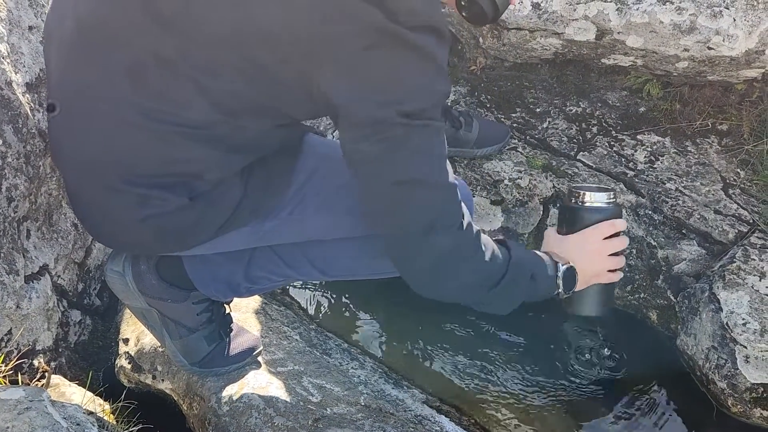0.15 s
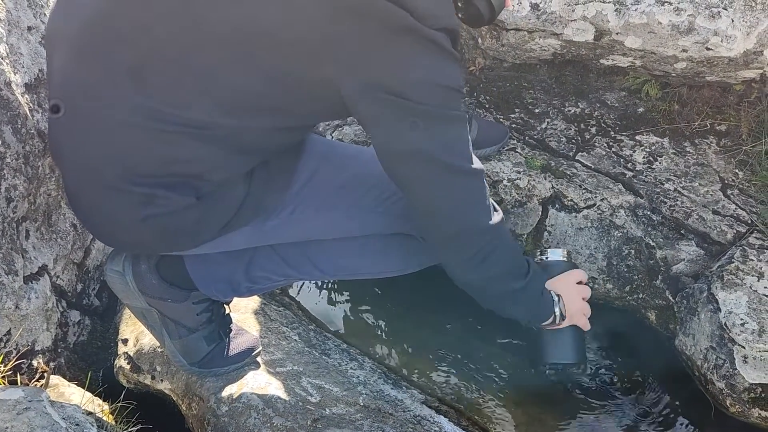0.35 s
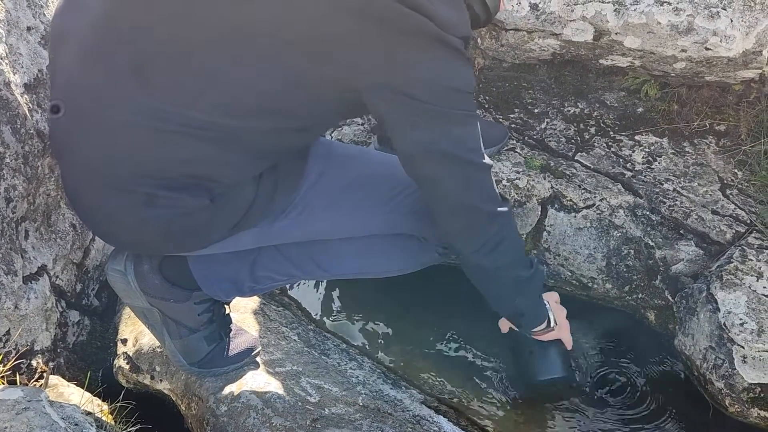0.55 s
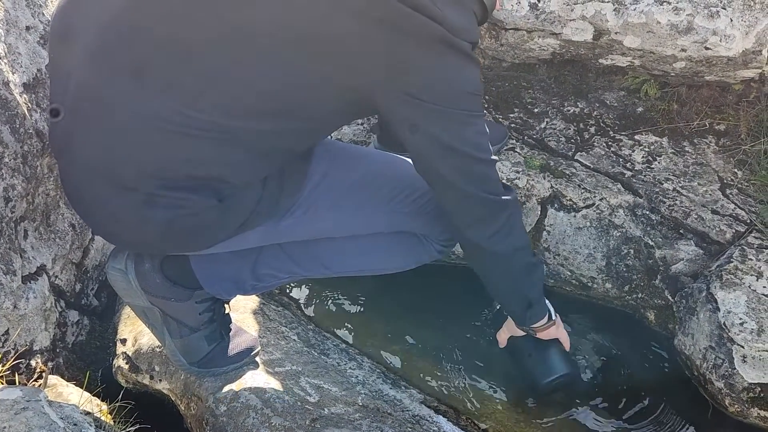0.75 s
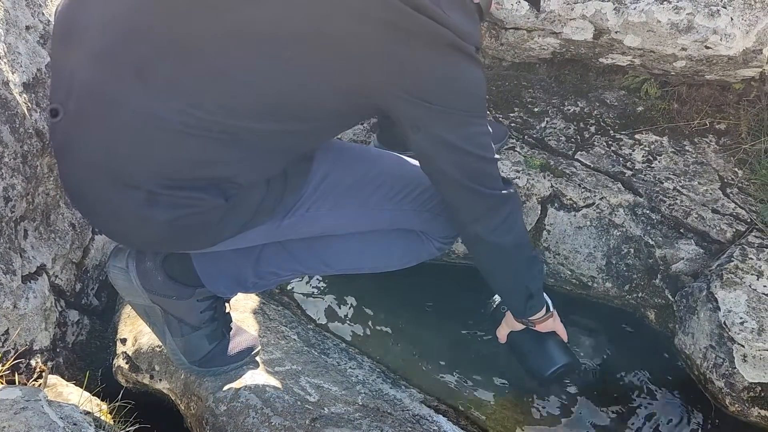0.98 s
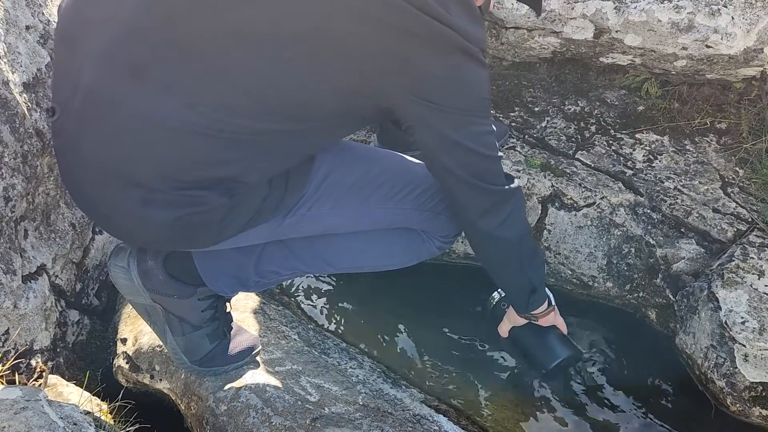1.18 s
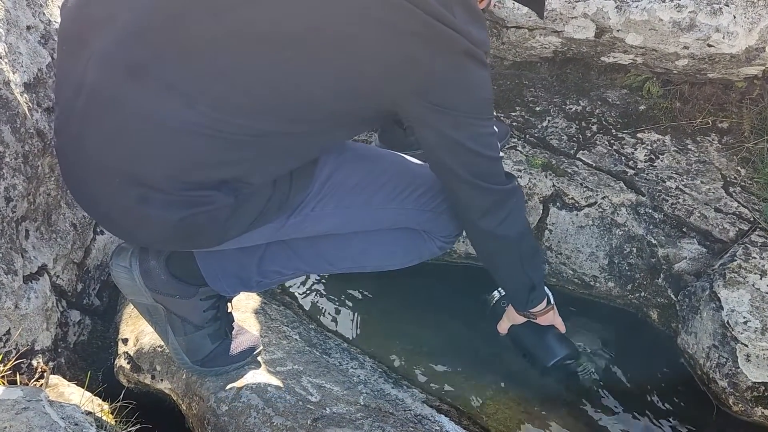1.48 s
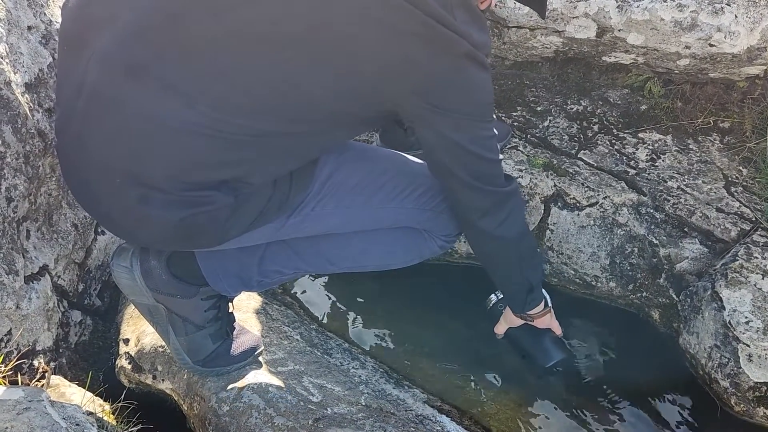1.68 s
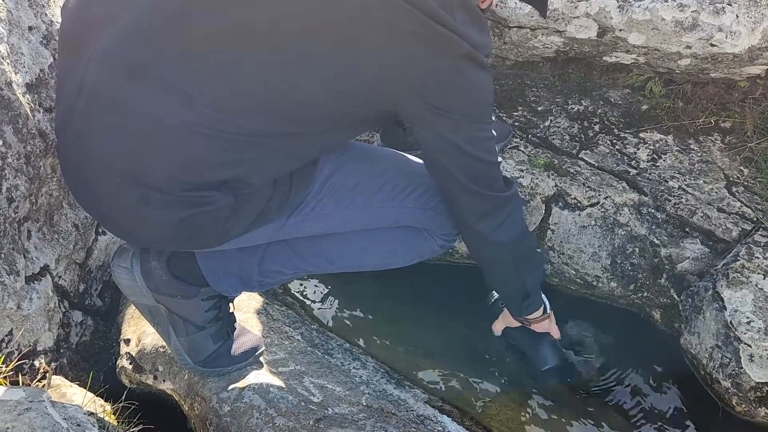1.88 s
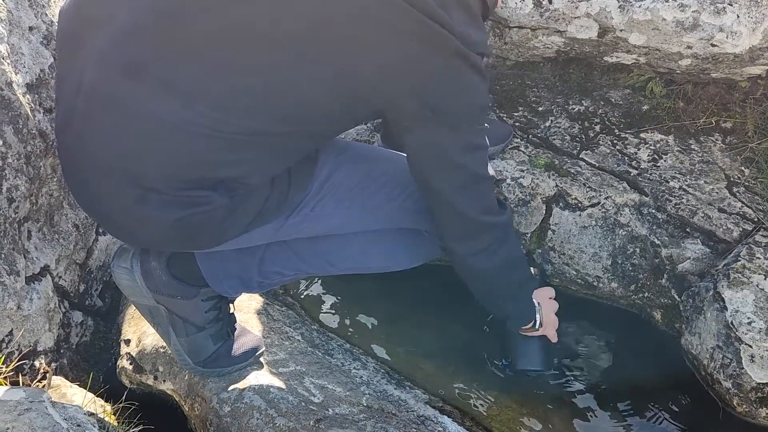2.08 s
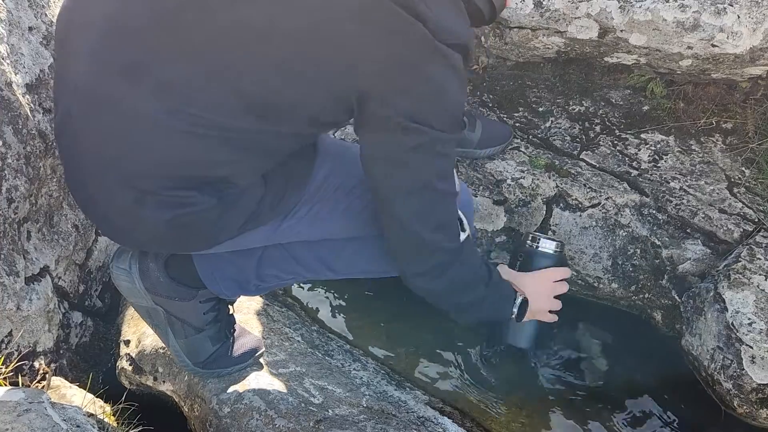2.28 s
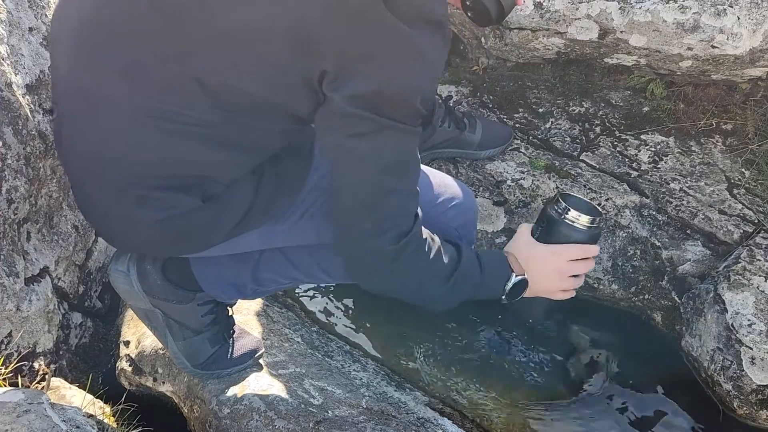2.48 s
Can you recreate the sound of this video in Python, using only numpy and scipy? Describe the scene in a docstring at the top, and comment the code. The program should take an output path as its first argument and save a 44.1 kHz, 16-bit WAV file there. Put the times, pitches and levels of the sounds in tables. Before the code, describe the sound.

Water plinks and splashes lightly as a metal bottle dips into a rock pool at about 0.5 seconds, with small bubbles until 0.9. After a lull, the bottle gulps twice around 2 seconds with a brief hollow hum. From 2.3 to 2.6 seconds water sloshes, drips and spatters as it lifts out, the loudest part. A faint outdoor rumble and hiss continue throughout.

```python
"""A low outdoor rumble and a faint hiss, then plinks as a metal bottle is dipped into a rock pool.
Drops slap the surface, trapped bubbles ring as damped oscillators and moving water stirs resonances.
The bottle is held under; its mouth gulps twice, exciting its modes, and air hums in its neck.
As it is lifted out, water sloshes and spatters and a hollow closes with a rising tone.
The rocks give a short echo."""
import sys
import numpy as np
from scipy import signal
from scipy.fft import rfft, irfft
from scipy.io import wavfile
from scipy.ndimage import uniform_filter1d

SR = 44100
rng = np.random.default_rng(int(sys.argv[2]) if len(sys.argv) > 2 else 0)


def output_pcm(signal):
    """Save a mono or channel-first signal as 16-bit PCM at the path in sys.argv[1].

    Samples are clipped to [-1, 1] before scaling.
    """
    pcm = np.clip(np.atleast_2d(signal).T, -1, 1) * 32767
    wavfile.write(sys.argv[1], SR, np.round(pcm).astype(np.int16))


N = 116865


def undb(db):
    """Decibels to amplitude ratio."""
    return 10 ** (np.asarray(db) / 20)


def add(out, start, sound):
    """Superposition: a sound adds to the mix from its start time."""
    i = int(np.clip(start * SR, 0, N - 1))
    out[i:i + len(sound)] += sound[:N - i]


def envelope(attack_s, t60):
    """Time axis and envelope of a quick rise and an exponential decay, 60 dB in t60 seconds."""
    t = np.arange(int(t60 * SR) + 64) / SR
    return t, (1 - np.exp(-t / attack_s)) * np.exp(-np.log(1000) * t / t60)


def noise(colour, size):
    """Spectral shaping: noise of unit variance, weighted by colour(frequency) in dB."""
    hz = np.maximum(np.arange(size // 2 + 1) * SR / size, 1)
    shaped = irfft(rfft(rng.standard_normal(size)) * undb(colour(hz)), size)
    return shaped / np.std(shaped)


def ring(hz, t60, bend=0, settle_s=0.0298):
    """A damped oscillator whose frequency shifts by the fraction bend; long rings rise more slowly."""
    t, env = envelope(0.024 * t60, t60)
    pitch = hz * (1 + bend * (1 - np.exp(-t / settle_s)))
    return env * np.sin(2 * np.pi * np.cumsum(pitch) / SR)


def waver(per_s=105):
    """Random modulation: twice-averaged noise gives a quick wobble of unit variance."""
    size = int(SR / per_s)
    smooth = uniform_filter1d(uniform_filter1d(rng.standard_normal(N), size), size)
    return smooth / np.std(smooth)


def bubble_cloud(curve, per_s, low_hz, high_hz, cycles, scatter_db=3):
    """Incoherent sum of random bubbles along a level curve, each dying away in `cycles` periods."""
    out = np.zeros(N)
    times, levels = np.array(curve).T
    draws = rng.random((int(per_s * np.ptp(times)), 4))
    for k, (jitter, height, strength, bend) in enumerate(draws):
        start = times.min() + (k + jitter) / per_s
        hz = low_hz * (high_hz / low_hz) ** height
        scatter = -np.log(max(1 - strength, .05)) - 1  # a few bubbles stand out
        db = np.interp(start, times, levels) + scatter_db * scatter
        add(out, start, undb(db) * ring(hz, cycles / hz, 0.75 * (bend - .5)))
    return out


def cavity(curve, waver_share=0.0248, waver_db=3):
    """Cavity resonance: an air pocket's pitch follows its size and trembles with the water."""
    t = np.arange(N) / SR
    times, hz, db = np.array(curve).T
    sounding = (t > times[0]) & (t < times[-1])
    pitch = np.interp(t, times, hz) * (1 + waver_share * waver())
    gain = undb(np.interp(t, times, db) + waver_db * waver())
    return sounding * gain * np.sin(2 * np.pi * np.cumsum(pitch) / SR)


def outdoors(rumble_db=-51.5, hiss_db=-67, crossover_hz=1500):
    """Ambient noise of the open air: one spectrum split into steady rumble and slowly swelling hiss."""
    # background spectrum before the split (frequency [Hz], relative density [dB])
    air = [(22, -14.5), (48, -2), (70, .5), (128, -15.5), (229, -19), (480, -35), (700, -33.5),
           (1200, -40.5), (1600, -38.5), (2300, -44.5), (4500, -32), (6700, -34), (7500, -41.5),
           (9800, -38), (10600, -47), (16000, -50)]
    # swell of the hiss (time [s], relative level [dB])
    swell = [(0, -2.5), (.9, -0.5), (1.35, 2), (1.7, -3.5), (2.65, 4.5)]
    hz, db = np.array(air).T
    colour = lambda f: np.interp(np.log(f), np.log(hz), db)
    rolloff = lambda ratio: 10 * np.log10(1 + ratio ** 4)
    rumble = noise(lambda f: colour(f) - rolloff(f / crossover_hz) - rolloff(18 / f), N)
    hiss = noise(lambda f: colour(f) - rolloff(crossover_hz / f), N)
    swell_db = np.interp(np.arange(N) / SR, *np.array(swell).T)
    return undb(rumble_db) * rumble + undb(hiss_db + swell_db) * hiss


def slaps(gain_db=-1, attack_s=0.0008, skirt_db=-26, top_hz=11130):
    """Impact noise: water striking water radiates short band-limited bursts, soft at the very top."""
    # surface impacts (time [s], relative level [dB], centre [Hz], half-width [octaves], t60 [s])
    impacts = [ (0.2823, -37, 5150, 0.37, .03), (0.2821, -35.5, 12400, 0.46, 0.008),
               (0.32, -49, 7070, 0.27, 0.054), (0.347, -46, 12000, .4, 0.017),
               (0.457, -28.5, 5650, 0.23, 0.015), (0.463, -40.5, 8700, 0.17, 0.036),
               (.468, -31, 2550, 0.83, 0.024), (0.535, -36.5, 4350, 0.25, 0.037),
               (0.5347, -37.5, 6800, 0.28, 0.053), (.661, -41.5, 4120, 0.28, 0.032),
               (0.719, -45.5, 3730, 0.19, 0.078), (0.719, -49.5, 1790, 0.31, 0.15),
               (0.796, -49.5, 4970, 0.72, 0.12), (0.8369, -40.5, 3300, 1.2, 0.033),
               (1.74, -52, 4360, 0.17, 0.026), (1.858, -52, 3750, 0.16, 0.077),
               (1.916, -49, 8300, 0.3, 0.07), (1.9731, -34, 2830, 0.19, 0.041),
               (1.972, -36, 4350, 0.48, 0.044), (2.029, -38.5, 2700, 0.98, 0.056),
               (2.036, -37.5, 6480, 0.13, 0.059), (2.035, -44.5, 5850, 0.57, 0.2),
               (2.268, -53.5, 8300, 0.26, 0.018), (2.338, -43.5, 3580, 0.25, 0.16),
               (2.358, -42, 4760, 0.83, 0.05), (2.37, -38.5, 2760, 1.2, 0.03),
               (2.396, -46, 4200, .6, 0.028), (2.418, -36.5, 6140, 0.63, 0.03),
               (2.446, -32, 3900, 0.49, 0.046), (2.446, -40, 11600, 0.27, 0.018),
               (2.462, -40, 5170, 0.74, 0.035), (2.477, -32, 3770, .35, 0.017),
               (2.488, -30.5, 4460, 0.32, 0.047), (2.4996, -26, 5000, 1.5, 0.026),
               (2.506, -20.5, 2380, .6, 0.012), (2.515, -33.5, 6000, 1.1, 0.029),
               (2.536, -24, 4080, 1, 0.016), (2.553, -39.5, 7400, 0.55, 0.12),
               (2.5695, -34, 6500, 1.9, 0.022), (2.579, -32, 5400, 0.55, 0.019),
               (2.6384, -38.5, 9000, 0.73, 0.0063)]
    out = np.zeros(N)
    top = lambda f: -10 * np.log10(1 + (f / top_hz) ** 10)
    for start, db, hz, octaves, t60 in impacts:
        band = lambda f: -10 * np.log10(1 + (np.log2(f / hz) / octaves) ** 6)
        spray = noise(lambda f: np.maximum(band(f), skirt_db) + top(f), 32768)
        _, env = envelope(attack_s, t60)
        add(out, start, undb(db + gain_db) * env * spray[:len(env)])
    return out


def rocks(direct, echo_s=.0046, echo_db=-14.5, tail_db=-15):
    """Reflection and scattering: the rocks add one close echo and a short diffuse tail."""
    _, env = envelope(attack_s=0.0028, t60=0.19)
    tail = env * rng.standard_normal(N)[:len(env)]
    response = undb(tail_db) * tail / np.linalg.norm(tail)
    response[int(echo_s * SR)] += undb(echo_db)
    return direct + signal.fftconvolve(direct, response)[:N]


def fizz():
    """Small bubbles resonate at high frequencies, louder where the water is stirred."""
    # fine bubbles (time [s], typical bubble level [dB])
    levels = [(.3, -69.5), (.55, -61.5), (.8, -58), (1.05, -75.5), (1.9, -71.5), (2.06, -61), (2.3, -81),
              (2.38, -61.5), (2.5, -46.5), (2.575, -41), (2.605, -69)]
    return bubble_cloud(levels, per_s=1000, low_hz=2322, high_hz=9170, cycles=46.4)


def bubbles(gain_db=0.5):
    """Bubble resonance: trapped air is a spring, the water around it a mass, and each pair plinks."""
    # bubbles (time [s], starting frequency [Hz], relative level [dB], t60 [s], bend [fraction])
    plinks = [ (0.34, 3230, -49, 0.026, -0.27), (.432, 6150, -45.5, 0.012, -0.13),
              (0.4576, 5060, -23, .013, -0.19), (.4618, 5040, -28, 0.021, 0.13),
              (.468, 1740, -25, 0.02, -0.21), (0.476, 1588, -31, 0.048, -0.13),
              (0.4869, 1480, -37.5, 0.032, -0.08), (0.488, 4280, -42.5, 0.014, -0.026),
              (0.5855, 1420, -33.5, 0.28, -0.059), (0.5856, 1020, -42.5, .15, -0.2),
              (.586, 2830, -53, 0.12, -0.055), (.629, 2020, -50, 0.15, 0.022),
              (0.7156, 1520, -42, 0.029, -0.055), (.719, 2070, -50, 0.051, 0.041),
              (.772, 1784, -49.5, 0.074, 0.061), (0.7963, 1460, -46, 0.069, 0.088),
              (0.8363, 1238, -31.5, 0.071, 0.029), (0.838, 1810, -32, 0.025, 0.056),
              (0.8436, 1460, -31.5, 0.011, 0.048), (0.849, 1324, -49, 0.21, 0.01),
              (0.9966, 1836, -55.5, 0.031, -0.046), (1.9728, 1422, -23, 0.05, 0.047),
              (1.9745, 980, -29.5, 0.071, -0.13), (1.975, 669, -26, 0.08, -0.057),
              (2.3434, 3130, -28.5, 0.029, -0.17), (2.343, 1460, -33.5, 0.016, -0.1),
              (2.356, 8650, -34.5, 0.02, -0.043), (2.371, 664, -33.5, 0.072, -0.12),
              (2.3715, 6180, -34.5, 0.014, 0), (2.376, 4880, -32.5, 0.017, -0.028),
              (2.399, 1395, -39, 0.032, -0.12), (2.418, 1790, -37, 0.029, 0.01),
              (2.4202, 4650, -32.5, 0.021, -0.0078), (2.423, 547, -34.5, 0.086, -0.0065),
              (2.4471, 530, -29.5, 0.041, 0.057), (2.448, 880, -30.5, 0.038, -0.13),
              (2.46, 1526, -33, 0.043, 0.22), (2.4758, 3380, -21.5, 0.022, 0.1),
              (2.475, 3960, -24.5, 0.017, 0), (2.489, 1890, -35.5, 0.049, 0.05),
              (2.4991, 1536, -24, 0.033, -0.066), (2.5087, 1370, -28, 0.021, -0.066),
              (2.519, 5680, -25.5, 0.0086, 0.023), (2.521, 6230, -27, 0.013, -0.038),
              (2.539, 2653, -25, 0.03, -0.015), (2.54, 1248, -31.5, 0.047, -0.011),
              (2.5551, 6780, -25.5, 0.0087, 0.034), (2.5585, 3550, -25, 0.012, -0.026),
              (2.5623, 2775, -24, 0.02, 0.031), (2.5671, 3080, -33, 0.044, 0),
              (2.581, 4360, -33, 0.015, -0.076)]
    out = np.zeros(N)
    for start, hz, db, t60, bend in plinks:
        add(out, start, undb(db + gain_db) * ring(hz, t60, bend))
    return out


def wash():
    """Random excitation: running water drives the hollow resonances in and around the bottle."""
    # resonances (frequency [Hz], width [Hz], relative level [dB])
    modes = [(566, 110, -0.5), (864, 270, -1), (1180, 42, 1), (1444, 220, 0), (1874, 71, 0)]
    # water washing round the bottle (time [s], level [dB])
    levels = [(.45, -77.5), (.56, -65.5), (.85, -68.5), (1.02, -81.5), (1.97, -78), (1.985, -53),
              (2.05, -55.5), (2.15, -66), (2.31, -65), (2.37, -52), (2.5, -50.5), (2.6, -62)]
    power = lambda f: sum(undb(db) ** 2 / (1 + ((f - hz) / width) ** 2) ** 2 for hz, width, db in modes)
    gain = undb(np.interp(np.arange(N) / SR, *np.array(levels).T))
    return gain * noise(lambda f: 10 * np.log10(power(f)), N)


def neck_air():
    """The air pocket in the neck resonates with a low hum that fades after the gulps."""
    # tone of the pocket (time [s], frequency [Hz], level [dB])
    hum = [(1.972, 424, -49), (1.984, 410, -43.5), (2.02, 398, -47.5), (2.045, 373.6, -45),
           (2.11, 362, -55.5), (2.17, 377, -56.5), (2.245, 432, -67), (2.28, 453, -75)]
    return cavity(hum)


def bottle():
    """Free vibration: each gulp at the mouth excites the bottle's modes, which decay independently."""
    # gulps (time [s], gain [dB])
    gulps = [(1.976, -8.5), (2.030, 2.5)]
    # modes of the bottle (frequency [Hz], relative level [dB], t60 [s])
    modes = [(580, -43, 0.22), (863, -52, 0.27), (990, -40.5, 0.12), (1123, -37, 0.11), (1145, -55, .7),
             (1276, -38, 0.079), (1598, -43, 0.14), (1830, -38, 0.039)]
    out = np.zeros(N)
    for start, gulp_db in gulps:
        for hz, db, t60 in modes:
            add(out, start, undb(db + gulp_db) * ring(hz, t60))
    return out


def spatter():
    """Water running off the lifted bottle into the pool excites quickly damped bubble resonances."""
    # spatter (time [s], typical bubble level [dB])
    levels = [(2.34, -55), (2.43, -49), (2.48, -41), (2.585, -43.5)]
    return bubble_cloud(levels, per_s=1300, low_hz=1396, high_hz=8000, cycles=22)


def hollow():
    """A shrinking cavity rises in resonant frequency: the water closes behind the bottle."""
    # tone of the hollow (time [s], frequency [Hz], level [dB])
    glide = [(2.45, 590, -58), (2.466, 640, -38.5), (2.49, 661, -43.5), (2.502, 803, -42),
             (2.512, 973, -35.5), (2.523, 1070, -77)]
    return cavity(glide)


def scene():
    """The sources superpose; all but the fizz and the background echo from the rocks."""
    background = outdoors()
    water = bubbles() + slaps() + bottle() + neck_air() + hollow() + wash()
    fine_bubbles = fizz()
    return (rocks(water + spatter()) + fine_bubbles + background)[None]


def record(dry):
    """An elliptic low-pass filter removes the highest treble."""
    cutoff_hz = 15900
    return signal.sosfilt(signal.ellip(8, .2, 70, cutoff_hz, fs=SR, output="sos"), dry)


dry = scene()
out = record(dry)
output_pcm(out)
```